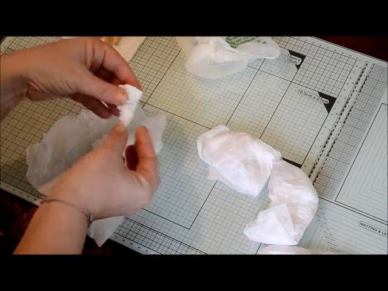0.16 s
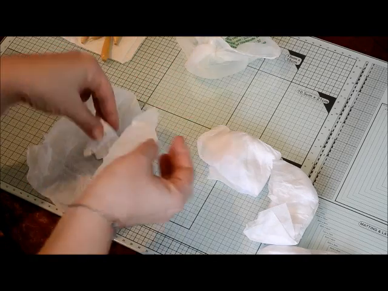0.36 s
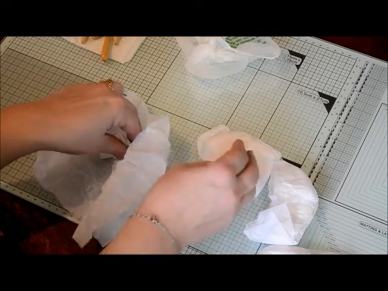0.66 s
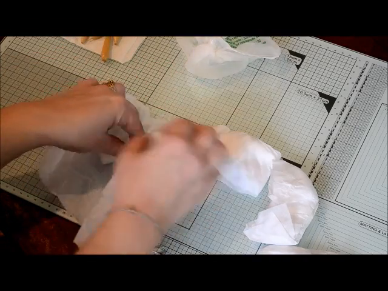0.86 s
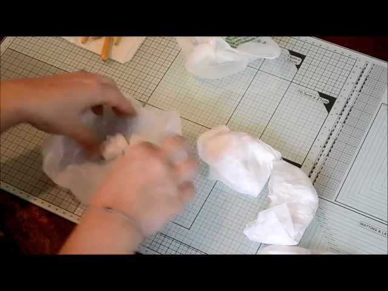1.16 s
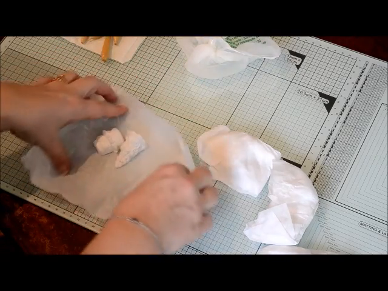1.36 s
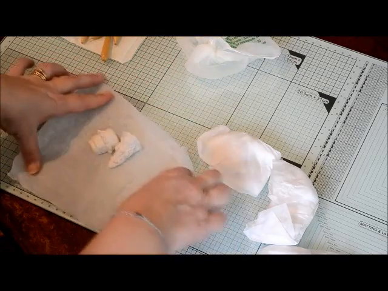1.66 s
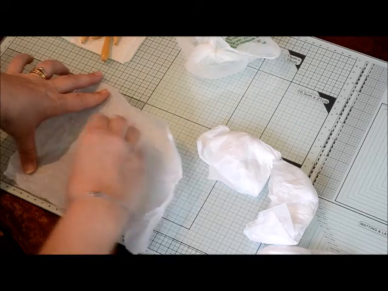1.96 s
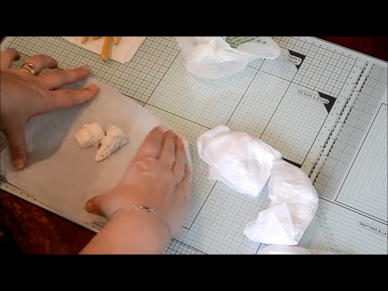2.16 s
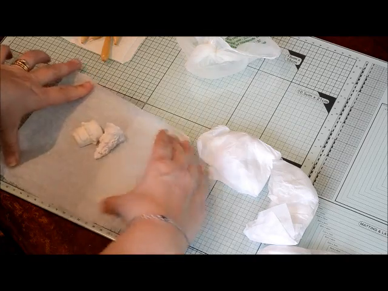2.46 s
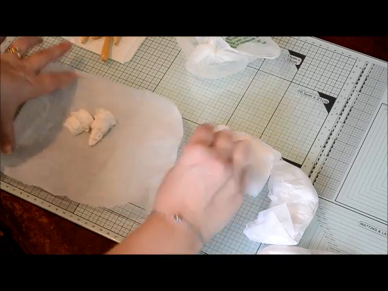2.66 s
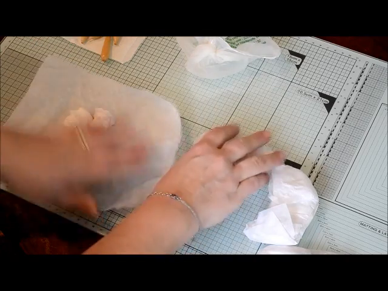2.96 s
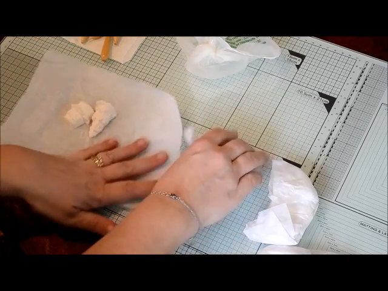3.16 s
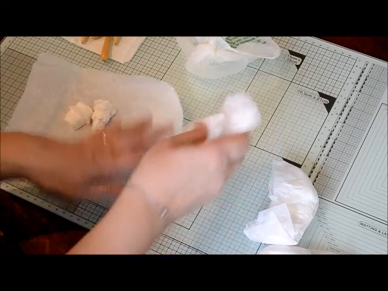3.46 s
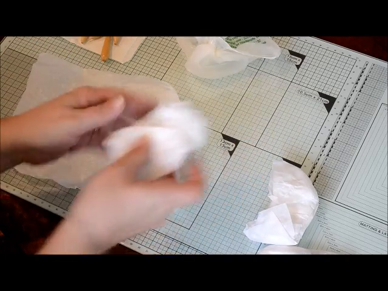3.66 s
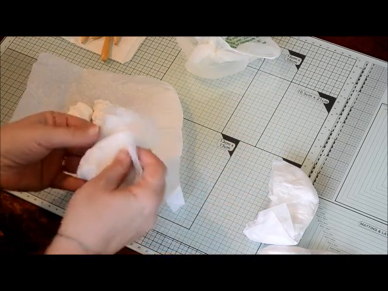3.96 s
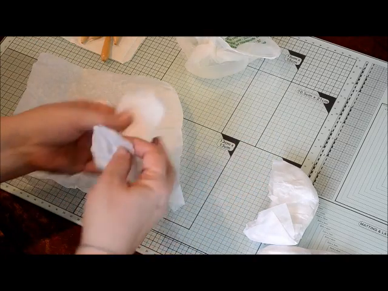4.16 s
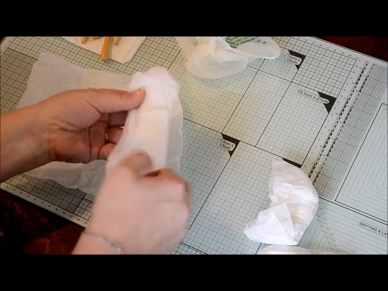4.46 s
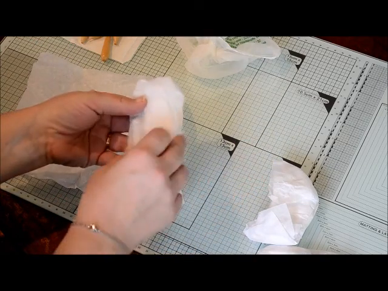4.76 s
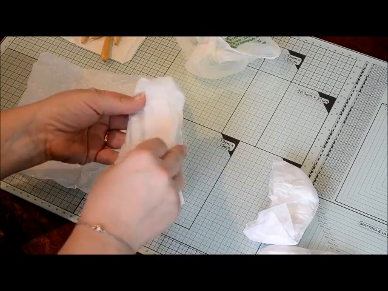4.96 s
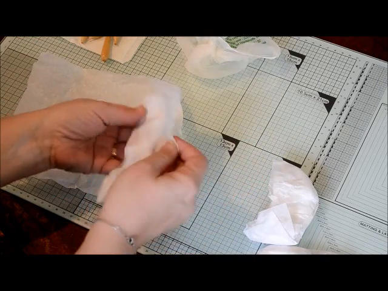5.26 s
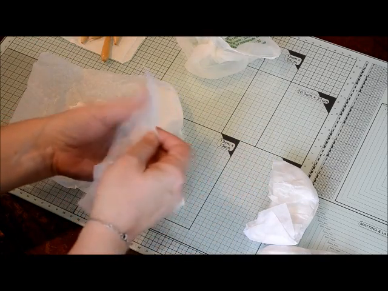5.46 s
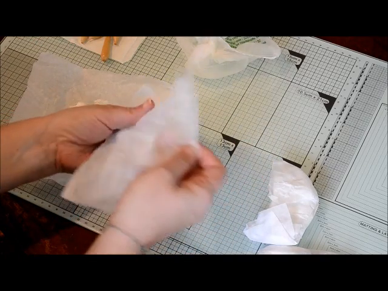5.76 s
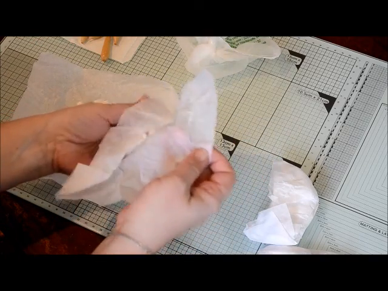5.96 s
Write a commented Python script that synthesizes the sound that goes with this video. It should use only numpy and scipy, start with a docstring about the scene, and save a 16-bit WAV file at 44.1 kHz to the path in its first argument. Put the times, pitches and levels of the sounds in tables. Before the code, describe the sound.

Hands work thin tissue paper close to the microphone in a quiet room with faint air noise and a short reverberation. Light crinkles and small, crisp snaps open the sound, with a few soft, dull bumps on a cutting mat between 0.5 and 1 second. From about 1.2 to 1.8 seconds the paper rustles more strongly and hisses as it is spread out. A sharper crackle and a bump come at about 2.1 seconds, followed by more smoothing and a few ticks near 2.6 seconds. From about 2.9 to 4.6 seconds the handling is mostly gentler, with short swishes and scattered snaps as another piece is picked up and turned. From 4.7 seconds it is unrolled in fuller bursts of crinkling, with distinct snaps near 5.1 and 5.9 seconds and light bumps just before the end at about 6 seconds.

```python
"""In a quiet room, close by, hands unwrap small items from thin tissue paper on a cutting mat.
Creases buckle and release their elastic energy as swarms of tiny snaps, a few of them loud.
Stick-slip friction makes the sheet hiss as it is slid and smoothed; taut folds resonate for a moment.
Fingers and items bump the damped mat, and the room adds a short reverberation and faint air noise."""
import sys
import numpy as np
from scipy import signal
from scipy.fft import rfft, irfft, next_fast_len
from scipy.io import wavfile

SR = 44100
rng = np.random.default_rng(int(sys.argv[2]) if len(sys.argv) > 2 else 0)


def generate_wav(sig):
    """Save sig (samples, or channels by samples) to the path in sys.argv[1] as 16-bit PCM at SR."""
    pcm = np.round(np.clip(np.atleast_2d(sig).T, -1, 1) * 32767).astype(np.int16)
    wavfile.write(sys.argv[1], SR, pcm)


N = 268991
TIME = np.arange(N) / SR

# steady air noise of the room: (frequency [Hz], relative level [dB])
AIR_SPECTRUM = [(20, -13), (60, -8), (120, -2.5), (200, -1), (380, 0), (600, -3), (1000, -3.5),
                (2000, -8.5), (4000, -14), (11000, -18.5)]
# response of the dull, well damped mat: (frequency [Hz], gain [dB])
MAT_RESPONSE = [(60, -32), (180, -21), (330, -0.5), (600, -2.5), (1100, 5.5), (1600, 0.5), (2500, -3),
                (3500, -17), (9000, -7)]
# fingers and items striking the mat: (time [s], excitation level [dB])
MAT_BLOWS = [(.319, -46), (.455, -46), (.539, -37), (.754, -39.5), (.884, -47), (.975, -36.5), (1.508, -43),
             (2.145, -35.5), (2.636, -47), (3.523, -45), (4.125, -43), (5.137, -46), (5.297, -40.5),
             (5.363, -44), (5.872, -35), (5.971, -37.5)]
# hands opening, smoothing, turning and unrolling the paper:
# (start [s], length [s], rustle level [dB], attack [s], release [s], body [dB], crispness [dB])
HAND_MOVES = [(0.0, 0.096, -61, .01, 0.016, 4.5, -3), (.31, 0.0606, -56, 0.063, 0.035, 8, -0.5),
              (.48, .18, -51, 0.015, 0.0297, 2.5, -3.5), (.75, .025, -51, 0.057, .06, 4.5, -7),
              (0.887, .17, -51.5, 0.022, 0.13, 4.5, -1.5), (1.17, .6, -47.5, 0.016, 0.0397, -0.5, 1.5),
              (1.255, .285, -43, 0.037, .07, 1, 1), (2.072, .332, -47.5, .018, 0.047, 4, 2),
              (2.126, .08, -41, 0.025, 0.0099, 1.5, 2.5), (2.485, .06, -44.5, 0.031, .055, 1, 1),
              (2.895, .305, -51.5, 0.003, 0.0748, 5.5, 0), (3.33, .28, -53.5, 0.025, .12, 1, -1.5),
              (3.77, .35, -52.5, 0.026, 0.031, 0, -2), (4.115, .3, -48.5, 0.013, .11, 2.5, -1.5),
              (4.62, .11, -53.5, 0.028, .02, 2.5, 1), (4.755, 0.042, -43.5, 0.01195, 0.033, 7.5, 3),
              (4.86, .135, -43, .015, .048, 4.5, -1), (5.145, .12, -47.5, .018, 0.031, 5.5, 1),
              (5.3, .16, -52, 0.011, 0.021, 4, -0.5), (5.49, .39, -44, 0.011, .06, 4.5, -1),
              (5.975, .105, -47, 0.0319, 0.032, 5, -2)]
# brief harder pulls: (start [s], length [s], rustle level [dB])
HAND_TUGS = [(.905, .02, -56.5), (1.513, 0.018, -42.5), (2.138, 0.013, -35.5), (3.08, 0.0529, -45.5),
             (3.4, .015, -50), (3.845, .05, -46), (4.274, .07, -44.5), (4.862, 0.02767, -41),
             (4.945, 0.0361, -42), (5.485, 0.013, -38), (5.65, 0.053, -43), (5.868, 0.012, -47)]
# hiss of sliding paper: (frequency [Hz], relative level [dB])
FRICTION_SPECTRUM = [(60, -44), (200, -23.5), (340, -8), (600, -3.5), (1100, -2), (1800, 1), (3000, 2),
                     (5000, -1), (7500, -3), (11000, 0)]
# colouring of the swarm of small snaps: (frequency [Hz], gain [dB])
CRINKLE_RESPONSE = [(60, -40), (200, -32), (400, -12), (700, 0.5), (1100, 0.5), (1800, -4.5), (3000, 0),
                    (5000, 2), (7500, 0), (11000, 5.5)]
# folds that ring while taut; in one row the rustle thins around 750 Hz while the sheet slides on the mat:
# (start [s], end [s], frequency [Hz], bandwidth [Hz], boost [dB])
FOLD_RESONANCES = [(0.285, 0.536, 1908, 702.6, 8.5), (0.46, .64, 5100, 1001, 4),
                   (0.695, 0.756, 3930, 700, 5), (0.954, 1.064, 2348, 699.3, 2.5),
                   (2.101, 2.232, 1182, 196, 6), (2.112, 2.235, 1560, 248, 4.5),
                   (2.886, 3.36, 2750, 997, 4.5), (3.066, 3.221, 1101, 300, 1.5),
                   (3.653, 3.797, 2700, 899.5, 2.5), (2.057, 2.616, 765, 351.1, -6.5),
                   (4.78, 5.05, 4588, 350, 5), (4.71, 5.299, 2006, 500.4, 4),
                   (5.569, 5.75, 2322, 799.5, 4.5), (5.98, 6.152, 2358, 988, 6.5)]
# large creases snapping through: (time [s], level with the energy put in 1 ms [dB], facet frequency [Hz])
LOUD_CREASES = [(0.0719, -41.5, 7950), (0.098, -44, 8150), (0.274, -41.5, 7390), (0.3196, -41.5, 8905),
                (0.477, -45, 1718), (0.4934, -53, 5300), (0.5083, -40.5, 4610), (0.5665, -32.5, 5355),
                (0.7184, -44, 3467), (0.7555, -44, 6990), (0.9777, -32.5, 5550), (0.9797, -37, 2452),
                (1.4419, -34, 7800), (1.4818, -31, 5970), (1.912, -54, 8547), (2.0002, -49, 9320),
                (2.036, -43, 5384), (2.1494, -30, 1161), (2.1967, -44, 9100), (2.5797, -42, 8150),
                (2.6365, -33, 9180), (2.6415, -36, 7270), (2.6843, -44, 3740), (2.7222, -43, 8700),
                (2.7318, -42, 9710), (2.8295, -45.5, 9106), (3.0168, -42, 3184), (3.3136, -42, 7800),
                (3.5938, -40, 4000), (3.6971, -43, 2856), (3.7187, -37.5, 2785), (3.7581, -52, 3008),
                (3.857, -33, 8536), (4.125, -33, 5960), (4.5846, -42.5, 4645), (4.7512, -35.5, 9090),
                (5.1387, -30, 7300), (5.1386, -31.5, 9990), (5.2425, -34, 6800), (5.304, -40, 4905),
                (5.7604, -35.5, 7992), (5.8785, -30.5, 9205), (5.924, -35, 9460), (6.0287, -39, 8500)]
# microphone response: (frequency [Hz], gain [dB])
MIC_RESPONSE = [(20, -7.5), (6000, 1), (7450, 2), (7900, -4.5), (8300, 2), (9400, 2.5), (10000, -0.5),
                (10600, -6.5), (11100, -14), (11600, -30)]

TOP_HZ = 11600  # upper band limit


def undb(db):
    """Amplitude ratio of a level in decibels."""
    return 10 ** (np.asarray(db) / 20)


def unit(x):
    """Normalisation to an rms of one."""
    return x / np.sqrt(np.mean(x ** 2))


def colour(x, points):
    """Linear filtering by a response of (frequency [Hz], gain [dB]) points."""
    hz, db = np.transpose(points)
    size = next_fast_len(N + SR // 2)
    f = np.maximum(np.fft.rfftfreq(size, 1 / SR), 1)
    response = undb(np.interp(np.log(f), np.log(hz), db))
    return irfft(rfft(x, size) * response, size)[:N]


def wander(rate_hz):
    """Random modulation: straight lines between Gaussian values of unit spread."""
    return np.interp(TIME * rate_hz, np.arange(N), rng.standard_normal(N))


def place(times, sounds):
    """Superposition of short sounds, one a row, at their times."""
    at = (times * SR).astype(int)[:, None] + np.arange(sounds.shape[1])
    return np.bincount(at.ravel(), sounds.ravel(), minlength=N)[:N]


def air(level_db=-66.5):
    """Ambient noise: a faint stationary floor, strongest at low frequencies."""
    return undb(level_db) * unit(colour(rng.standard_normal(N), AIR_SPECTRUM))


def room(direct, t60_s=0.38, send_db=-9.5, size=16384):
    """Reverberation: diffuse reflections from table and walls decay exponentially and lose treble."""
    t = np.arange(size) / SR
    tail = rng.standard_normal(size) * np.exp(-np.log(1000) * t / t60_s) * (t > .003)
    reflected = signal.fftconvolve(direct, tail / np.sqrt(np.sum(tail ** 2)))[:N]
    return direct + undb(send_db) * colour(reflected, [(300, 4), (1200, 0.5), (5000, 0), (10000, -8.5)])


def mat_bumps(rise_s=0.00087, decay_s=0.016, size=2048):
    """Damped impact: blows cushioned by the paper draw short toneless thuds from the mat."""
    times, db = np.transpose(MAT_BLOWS)
    t = np.arange(size) / SR
    envelope = (1 - np.exp(-t / rise_s)) * np.exp(-t / decay_s)
    thuds = rng.standard_normal((len(times), size)) * envelope * undb(db)[:, None]
    return colour(place(times, thuds), MAT_RESPONSE)


def push(start, length, db, attack_s, release_s):
    """Power envelope of one push on the paper: exponential growth, a hold, exponential decay."""
    away = np.maximum(start - TIME, 0) / attack_s + np.maximum(TIME - start - length, 0) / release_s
    return (undb(db) * np.exp(-np.minimum(away, 20))) ** 2


def handling(rest_db=-71, rest_body_db=11):
    """Incoherent addition: powers sum to the rustle level; moves weight body and crispness by power."""
    power = np.full(N, undb(rest_db) ** 2)  # the paper settling between moves
    body, crisp = rest_body_db * power, 0
    for *shape, body_db, crisp_db in HAND_MOVES:
        move = push(*shape)
        power += move
        body += body_db * move
        crisp += crisp_db * move
    tugs = sum(push(*tug, attack_s=0.012, release_s=.025) for tug in HAND_TUGS)
    return 10 * np.log10(power + tugs), body / power, crisp / power


def slips(rate_hz=70, decay_s=.008):
    """Relaxation: tension lets go in sudden random jerks that die away; zero mean, unit spread."""
    chance, force = rng.random((2, N))
    impulses = force * (chance < rate_hz / SR)
    release = signal.lfilter([1], [1, -np.exp(-1 / (decay_s * SR))], impulses)
    return unit(release - release.mean())


def friction(jerks):
    """Stick-slip friction: paper sliding on skin and mat hisses as it catches and lets go."""
    hiss = colour(rng.standard_normal(N), FRICTION_SPECTRUM)
    return unit(hiss * undb(1.4 * wander(500) + 1.4 * jerks))


def buckle(hz, decay_s, rise_s, q, splash, size, low_hz=700, settle_db=-17, settle_s=0.013):
    """Resonance: a rattle of fibres rings the facet beside a crease; one snap of unit energy a row."""
    t = np.arange(size) / SR
    burst = (1 - np.exp(-t / rise_s)) * np.exp(-t / decay_s[:, None])
    settle = undb(settle_db) * np.exp(-t / settle_s)  # the sheet around goes on fluttering
    rattle = rng.standard_normal((len(hz), size)) * (burst / burst.max(axis=1, keepdims=True) + settle)
    f = np.maximum(np.fft.rfftfreq(size, 1 / SR), 1)
    facet = 1 / (1 + 1j * q * (f / hz[:, None] - hz[:, None] / f))
    radiation = (1j * f / (low_hz + 1j * f)) ** 2  # a small source radiates low frequencies poorly
    snap = irfft(rfft(rattle) * (facet + splash) * radiation * (f < TOP_HZ), size)
    return snap / np.sqrt(np.sum(snap ** 2, axis=1, keepdims=True))


def crinkle(level_db, jerks, count=14000):
    """Crackling noise: small snaps crowd as the paper is worked harder, and jerks set off avalanches."""
    when, chance, facet, length, force = rng.random((count, 5)).T
    times = when * (N - 1) / SR
    base_rate_hz = 1000 * undb(.45 * (np.interp(times, TIME, level_db) + 50))
    share = np.minimum(base_rate_hz * N / SR / count, 1)
    live = chance < share * undb(3 * np.interp(times, TIME, jerks))
    hz = 900 + 9800 * facet[live] ** 1.28
    decay_s = 0.00033 * (hz / 5000) ** -.4 * undb(11.4 * length[live])  # low facets ring longer
    strength = undb(4.8 * np.minimum(-np.log(1 - force[live]), 3.0))  # many weak, few strong
    gain = unit(strength) * np.sqrt(N / count / share[live])  # power independent of the base rate
    snaps = buckle(hz, decay_s, rise_s=.0001, q=3.75, splash=0.3, size=256)
    return place(times[live], gain[:, None] * snaps)


def rustle(level_db, body_db, crisp_db):
    """Amplitude modulation: crinkle and hiss follow the uneven pull of the hands."""
    jerks = slips()
    crackle = undb(-3.5) * colour(crinkle(level_db, jerks), CRINKLE_RESPONSE)
    paper = crackle + undb(-1.12) * friction(jerks)
    # a wide moving sheet adds body, tight folds add crispness
    body = signal.sosfiltfilt(signal.butter(2, [470, 1700], "band", fs=SR, output="sos"), paper)
    crisp = signal.sosfiltfilt(signal.butter(3, 7200, "high", fs=SR, output="sos"), paper)
    shaped = paper + (undb(body_db) - 1) * body + (undb(crisp_db) - 1) * crisp
    return undb(level_db + .7 * wander(35)) * shaped


def taut_folds(paper, spread_hz=5000, ramp_s=0.0089):
    """Resonance: a taut fold gathers the rustle into a band; a negative boost thins the band instead."""
    for start, end, hz, width_hz, boost_db in FOLD_RESONANCES:
        held = np.clip(np.minimum(TIME - start, end - TIME) / ramp_s, 0, 1)
        gain = undb(boost_db * held)
        ring = signal.lfilter(*signal.iirpeak(hz, hz / width_hz, fs=SR), paper)
        power_ratio = 1 + (gain ** 2 - 1) * width_hz / spread_hz
        paper = (paper + (gain - 1) * ring) / np.sqrt(power_ratio)  # total energy stays about the same
    return paper


def stray_creases(level_db, count=55, growth=0.41, scatter_db=0.5):
    """Random buckling: lesser creases, stronger under harder handling, in rows like LOUD_CREASES."""
    when, force, facet = rng.random((count, 3)).T
    times = (np.arange(count) + when) / count * TIME[-1]
    effort_db = np.interp(times, TIME, level_db) + 48
    db = -44.5 + growth * effort_db + scatter_db * (2 * force - 1)
    hz = np.interp(facet, [0, 1], [3250, 9600])
    return np.column_stack([times, db, hz])


def crease_snaps(level_db):
    """Snap-through instability: the larger creases give way one at a time, each with a distinct click."""
    times, db, hz = np.vstack([LOUD_CREASES, stray_creases(level_db)]).T
    decay_s = 0.00072 * (hz / 6000) ** -.35
    snaps = buckle(hz, decay_s, rise_s=.0008, q=5.5, splash=0.27, size=1024)
    samples_per_ms = SR / 1000
    return place(times, snaps * np.sqrt(samples_per_ms) * undb(db)[:, None])


def scene():
    """Superposition: paper and mat sound in the room, over the steady air noise."""
    background = air()
    level_db, body_db, crisp_db = handling()
    paper = taut_folds(rustle(level_db, body_db, crisp_db))
    direct = paper + crease_snaps(level_db) + mat_bumps()
    return (room(direct) + background)[None]


def record(dry):
    """Frequency response: the microphone has a notch and peaks in the treble, then a steep cutoff."""
    low_pass = signal.ellip(8, .2, 70, TOP_HZ, fs=SR, output="sos")
    return signal.sosfilt(low_pass, colour(dry[0], MIC_RESPONSE))[None]


dry = scene()
out = record(dry)
generate_wav(out)
```